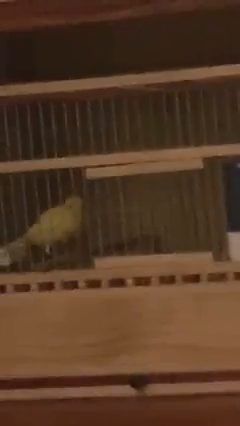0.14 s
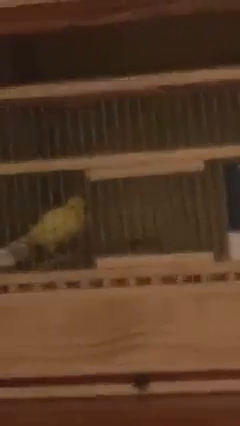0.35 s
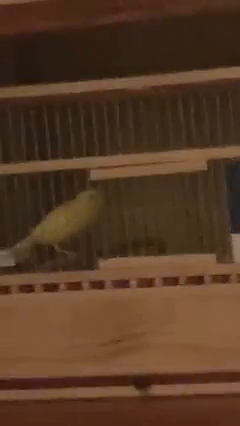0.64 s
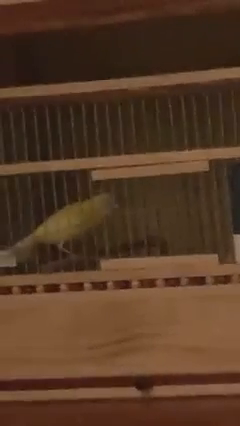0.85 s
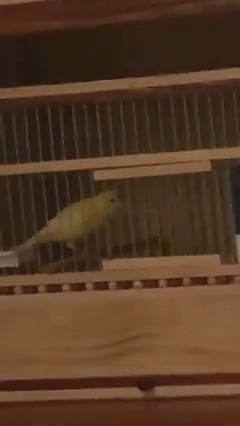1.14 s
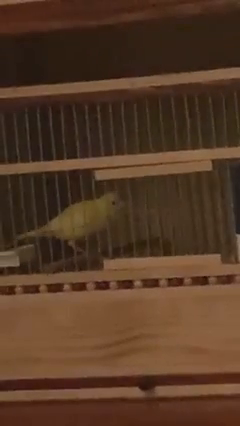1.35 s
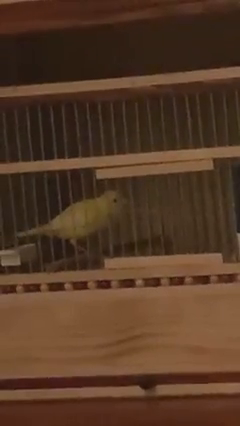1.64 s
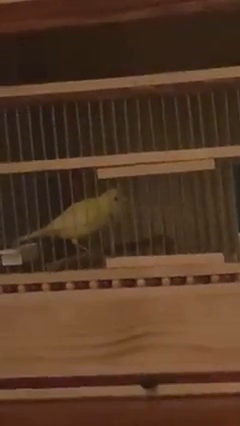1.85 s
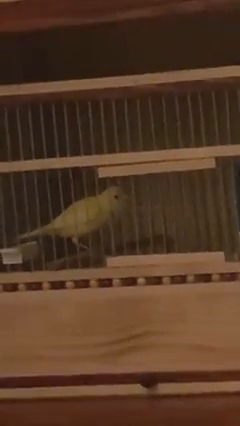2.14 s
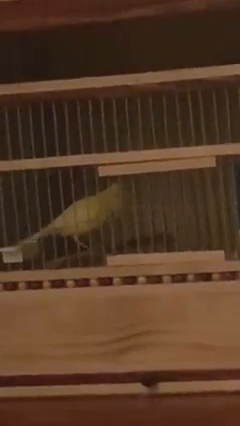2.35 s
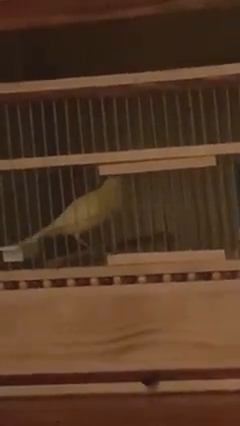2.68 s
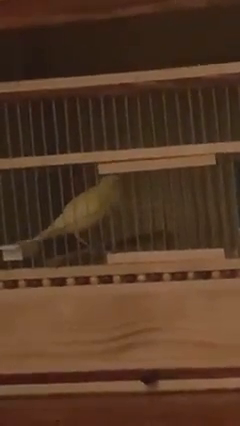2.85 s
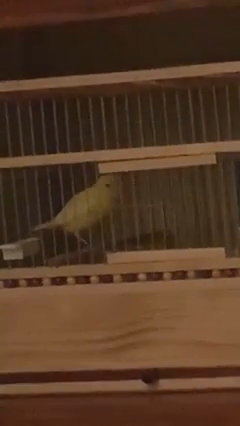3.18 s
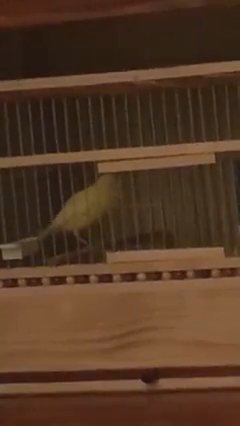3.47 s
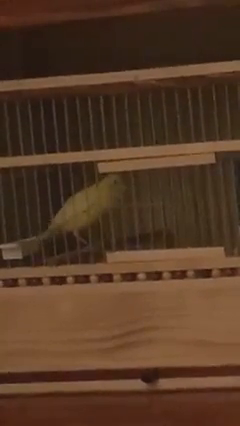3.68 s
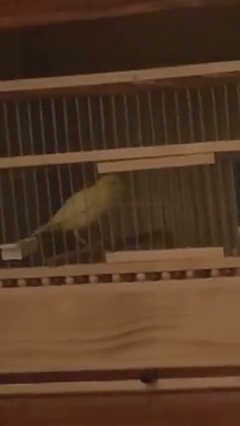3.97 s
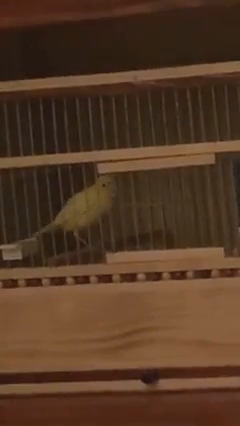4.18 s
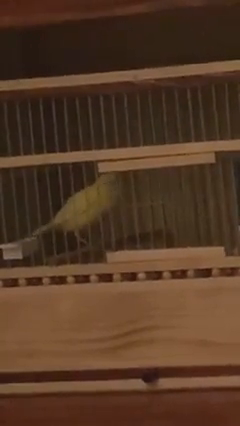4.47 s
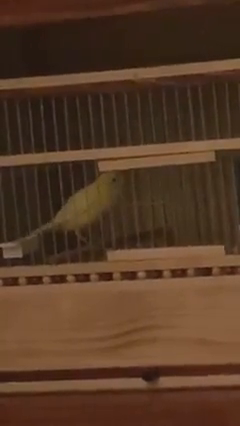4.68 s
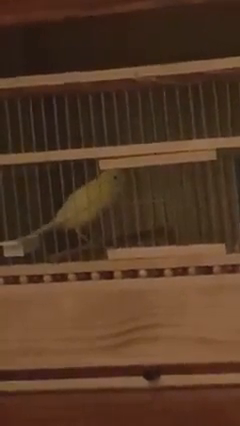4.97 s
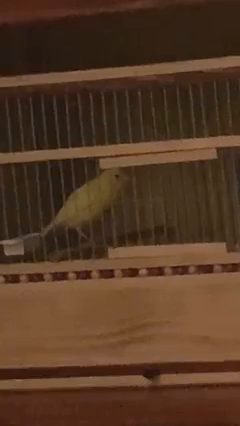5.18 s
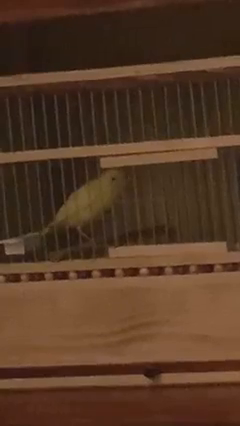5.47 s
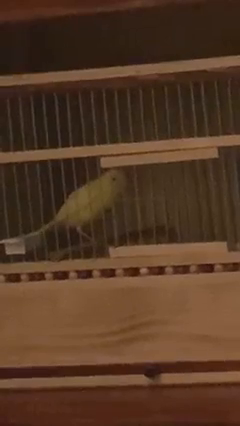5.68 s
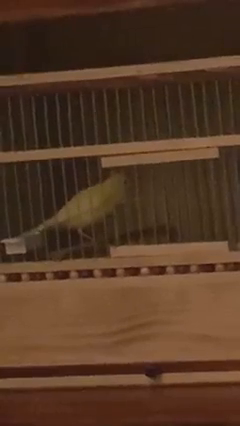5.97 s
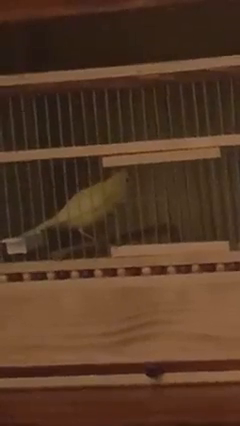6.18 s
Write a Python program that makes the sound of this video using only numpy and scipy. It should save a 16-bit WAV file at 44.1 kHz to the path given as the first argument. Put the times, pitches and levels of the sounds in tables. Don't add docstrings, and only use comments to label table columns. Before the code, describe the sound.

Small songbirds whistle, trill and chirp almost without pause indoors, over soft perch knocks, light wire rattles and a faint low rumble.

```python
import sys
import numpy as np
from scipy import signal
from scipy.fft import rfft, irfft, next_fast_len
from scipy.io import wavfile
from scipy.ndimage import uniform_filter1d, minimum_filter1d, map_coordinates

SR = 44100
rng = np.random.default_rng(int(sys.argv[2]) if len(sys.argv) > 2 else 0)


def gain_from_db(level_db):
    decades = np.asarray(level_db, float) / 20
    return 10 ** decades


def inscribe(sig):
    pcm = np.round(np.clip(np.atleast_2d(sig).T, -1, 1) * 32767)
    wavfile.write(sys.argv[1], SR, pcm.astype(np.int16))


N = 279153

# [f/Hz, density/dB per Hz]
RUMBLE_SPECTRUM = [(20, -21.5), (48, -10.5), (63, 9.5), (82, -0.5), (200, -5.5), (400, -74.5)]
MURMUR_SPECTRUM = [(100, -6), (200, -5.5), (400, -10.5), (800, -16), (1250, -10.5), (1600, -19.5),
                   (3000, -17.5), (5000, -38)]
HISS_SPECTRUM = [(3000, -49.5), (6000, 14), (8300, 10.5), (10500, 7.5), (12700, -12), (15800, -10)]
# [t/s, level/dB]
BUSTLE = [
    (0, -63.5),
    (.25, -81),
    (.6, -70),
    (1.6, -80),
    (2.0, -66.5),
    (2.7, -71.5),
    (3.5, -74.5),
    (4.2, -67.5),
    (5.1, -73.5),
    (6.33, -79.5),
]
RUMBLE_DB, SWELL_DB = -72, 9
SWELL_S, SWELL_WIDE_S = 2.58, 0.5

# [f/Hz, t60/s]
ROOM_T60 = [(300, 0.34), (2000, 0.33), (4000, 0.31), (8000, 0.3), (14000, 0.039)]
TAIL_S = np.arange(SR // 2) / SR
# [f/Hz, gain/dB]
MIC_RESPONSE = [(9000, 0.5), (11800, 0), (13000, -24.5), (15500, 1.5)]

# [t/s, peak level/dB, ring f/Hz]
FRAME_TAPS = [(0.129, -49, 217), (0.601, -54.5, 840), (0.834, -56, 846), (0.878, -55, 219),
              (0.942, -58.5, 804), (1.115, -49.5, 218.5), (1.208, -56, 858), (1.589, -58.5, 214),
              (1.94, -52.5, 826), (2.707, -48, 199), (3.169, -50, 631), (4.401, -51.5, 330),
              (5.943, -54.5, 848)]
# [t/s, peak level/dB, ring f/Hz]
KNOCKS = [
    (1.071, -53, 51.3),
    (1.34, -49.5, 1105),
    (3.01, -44, 1186),
    (4.575, -54, 48.4),
]

# [f/Hz, width/Hz, level/dB]
WOOD_MODES = [(256.5, 71, -6.5), (840, 646, -11.5), (1220, 106, 0), (1840, 1250, -20)]
WIRE_MODES = [(3480, 650, -5), (6500, 450, -10), (7760, 900, -17.5)]
CLAW_MODES = [(10530, 740, 11), (13700, 790, -3.5), (14900, 3900, -7)]
# [t/s, level/dB]
LANDINGS = [(.094, -54.5), (.926, -61), (1.129, -66.5), (1.21, -67), (1.338, -52.5), (1.85, -60.5),
            (1.899, -54.5), (2.379, -55.5), (2.745, -58.5), (3.011, -55), (3.117, -59), (3.167, -57),
            (3.531, -68), (3.64, -49.5), (3.819, -59.5), (3.888, -51), (3.966, -54), (4.15, -56.5),
            (4.235, -55), (4.345, -51), (4.547, -60.5), (4.767, -65.5), (4.936, -54), (5.364, -60.5),
            (5.889, -69), (5.946, -61)]
RATTLES = [(1.21, -55.5), (1.338, -49.5), (1.557, -50.5), (2.745, -69), (3.011, -60), (3.117, -70),
           (3.271, -50), (3.531, -45.5), (3.966, -59.5), (4.095, -39.5), (4.345, -44.5), (4.547, -50.5),
           (4.767, -70), (4.936, -63), (5.03, -53), (5.272, -40.5), (5.364, -49), (5.551, -55),
           (5.889, -65), (6.029, -42.5)]
SCRATCHES = [(1.557, -47), (1.899, -71.5), (2.379, -70.5), (2.745, -56.5), (3.011, -59.5), (3.117, -41.5),
             (3.271, -47.5), (3.531, -57.5), (3.966, -64.5), (4.105, -56), (4.345, -43), (4.77, -62.5),
             (5.03, -61), (5.272, -58), (5.364, -65), (5.551, -61.5), (5.889, -90), (6.029, -53)]

# [t/s, length/s, pitch f/Hz, glide/Hz, level/dB]
LOW_PIPES = [(0.0, 0.017, 2683, -52.5, -33.5), (0.37, 0.12, 2408, 278, -41),
             (1.158, 0.089, 2011, 188, -40.5), (1.758, 0.071, 2076, 317, -41.5),
             (1.953, 0.1, 2450, -130.0, -59.5), (2.411, 0.083, 2371, -17.5, -39.5),
             (2.636, 0.098, 2418, -62, -51), (3.571, 0.051, 2600, 102, -58.5),
             (3.861, 0.013, 2563, -54, -45), (4.131, 0.064, 2470, -32, -55.5),
             (4.488, 0.021, 2602, -4, -44.5), (4.721, 0.035, 2614, -13, -49.5),
             (4.875, 0.054, 2105, 3, -36.5), (4.983, 0.049, 2125, -15, -44), (5.062, 0.099, 2060, -9, -51),
             (5.342, 0.1, 2063, 118.5, -43.5), (5.467, 0.2, 2200.0, -9.5, -49),
             (5.61, 0.034, 2121, -58.5, -31), (5.737, 0.17, 2169, 21.5, -45),
             (6.027, 0.11, 2097, 5.5, -42.5), (6.2, 0.039, 2071, -29, -44),
             (6.229, 0.13, 2610.0, 83.5, -37)]
MID_WHISTLES = [(0.626, 0.3, 3357, 57, -35), (0.92, 0.089, 2962, 78, -34.5),
                (1.46, 0.14, 3130.0, -9, -34.5), (2.14, 0.015, 3203, 148, -44.5),
                (3.404, 0.11, 3258, -160.0, -40.5), (3.666, 0.05, 3260, -87, -40.5),
                (3.771, 0.063, 3173, -100, -49.5), (3.958, 0.16, 3184, -220.0, -48),
                (4.234, 0.065, 3195, 21.5, -37.5), (4.321, 0.087, 3223, -91, -46),
                (4.4, 0.1, 3288, -48.5, -34.5), (4.578, 0.16, 3238, -26, -36.5),
                (4.907, 0.1265, 3297, -170, -37), (5.21, 0.1, 3281, -30.0, -39.5),
                (5.98, 0.17, 3086, 80.0, -38)]
HIGH_WHISTLES = [(0.0, 0.013, 4200.0, -10.0, -39.5), (0.608, 0.115, 4265, 147.5, -37.5),
                 (1.214, 0.11, 4370, -250, -38.5), (1.508, 0.09, 3674, 343, -35),
                 (1.99, 0.072, 4073, 96, -42.5), (2.09, 0.21, 4710, 47.5, -44.5),
                 (2.827, 0.109, 4810, -33, -40.5), (2.944, 0.096, 4656, -40.5, -40),
                 (5.308, 0.09, 3990, 89.5, -49.5), (6.014, 0.049, 5850, 67, -52.5)]
TRILLS = [(1.451, 0.055, 5430, -530.0, -51.5), (1.921, 0.038, 5640, -350.0, -35.5),
          (2.378, 0.089, 5580, 109, -34), (2.581, 0.046, 5785, -84, -36.5),
          (2.945, 0.025, 6200, -100, -40.5), (2.957, 0.055, 5620, 45, -32),
          (3.156, 0.051, 5693, -56, -35.0), (3.343, 0.075, 5376, 249.5, -45.5)]
BUZZ_NOTES = [(0.144, 0.19, 3112, -50.0, -39.5), (1.72, 0.16, 3338, 428.5, -39),
              (2.203, 0.13, 3930, 100, -54), (2.729, 0.11, 3971, 108.5, -38),
              (3.264, 0.11, 4200, -250, -39.5), (3.507, 0.12, 4084, -120, -37.5),
              (4.177, 0.11, 3810, 455.5, -32), (5.558, 0.055, 4090, -100, -48),
              (6.21, 0.042, 3465, -150, -39.5)]
RASPS = [
    (3.098, 0.042, 5870, -200, -47.5),
    (3.102, 0.034, 3945, 153, -48.5),
    (4.758, 0.019, 4520, 33, -54.5),
    (5.264, 0.03, 4640.0, -12, -61),
]
BRIGHT_WHISTLES = [(1.551, 0.047, 5465, 39, -52), (3.73, 0.146, 5660, -140.0, -42),
                   (3.964, 0.114, 5473, -110.0, -40.5), (4.307, 0.04, 5360, -34.5, -48),
                   (4.508, 0.045, 5380, -750, -48), (4.771, 0.021, 5304, -14, -48.5)]
CHIPS = [(0.339, 0.029, 3733, -500, -40), (1.123, 0.028, 4255, -450, -43), (2.743, 0.023, 5220, 308, -46),
         (2.776, 0.023, 5550, 642, -42), (3.27, 0.038, 6646, -350, -38.5),
         (3.503, 0.014, 5964, -100, -41.5), (4.838, 0.028, 4136, -250, -41.5),
         (5.439, 0.021, 5690, -150, -42), (5.528, 0.0337, 4830, -650, -38.5),
         (5.754, 0.042, 3857, 343, -41.5), (5.873, 0.038, 4480, 495, -44), (5.884, 0.045, 5915, 340, -47),
         (6.016, 0.025, 4356, -450, -28)]
POPS = [
    (2.187, 0.0063, 3436, 45, -24.5),
    (6.193, 0.0087, 3520, -11, -22),
]
# [overtone level/dB, fade over note/dB, attack/s, release/s]
VOICES = [
    (-30.5, -6, .035, 0.032),
    (-28.5, -6, .035, 0.03),
    (-26, 1, 0.033, .035),
    (-45.5, 1, .025, 0.024),
    (-26.5, 9, .035, .035),
    (-2.5, 12.5, 0.0096, 0.044),
    (-14, 0, .025, 0.04),
    (-23.5, 3, 0.017, 0.016),
    (-33.5, -2, 0.0056, 0.014),
]
# [buzz depth at start/Hz, at end/Hz, quaver/Hz]
UNSTEADINESS = [(4, 12, 33), (6, 20, 36), (15, 45, 42), (40, 75, 45), (55, 170, 45), (250, 300, 42),
                (30, 50, 42), (25, 90, 42), (5, 40, 15)]
ATTACK_LEAD = 0.35
GLIDE_BEND = 0.65
VOICE_DB = 0.5


def unit(x):
    return x / np.sqrt(np.mean(x ** 2) + 1e-20)


def along(points, hz):
    f, value = np.transpose(points)
    return np.interp(np.log(hz + 1), np.log(f + 1), value)


def wobble(knots_hz, size):
    return map_coordinates(rng.standard_normal(size=400), [np.arange(size) * knots_hz / SR])


def filtered(x, response):
    m = next_fast_len(N + SR // 2)
    return irfft(rfft(x, m) * response(np.fft.rfftfreq(m, 1 / SR)), m)[:N]


def body(modes):
    def response(f):
        total = 0
        for k, (centre_hz, width_hz, db) in enumerate(modes):
            damping = 1j * f * width_hz
            total = total + (-1) ** k * gain_from_db(db / 2) * damping / (centre_hz ** 2 - f * f + damping)
        return total ** 2
    return response


def in_room(x, hz, direct_db):
    decay = gain_from_db(-60 * TAIL_S / along(ROOM_T60, hz))
    tail = rng.standard_normal(len(TAIL_S)) * decay * (1 - np.exp(-TAIL_S / 0.0013))
    tail = tail / np.linalg.norm(tail)
    tail[0] = gain_from_db(direct_db)
    return signal.fftconvolve(x, tail)


def add(track, start_s, x):
    part = track[round(max(start_s, 0) * SR):][:len(x)]
    part += x[:len(part)]


def rush(spectrum, patchy_db):
    z = signal.stft(rng.standard_normal(N), nperseg=512)[2]
    field = uniform_filter1d(rng.standard_normal(z.shape), 5, 0)
    field = uniform_filter1d(field, 12, 1)
    x = signal.istft(z * gain_from_db(patchy_db * unit(field)), nperseg=512)[1][:N]
    return unit(filtered(x, lambda hz: gain_from_db(along(spectrum, hz))))


def air():
    t = np.arange(N) / SR
    rumble_db = RUMBLE_DB + SWELL_DB * np.exp(-((t - SWELL_S) / SWELL_WIDE_S) ** 2)
    rumble = gain_from_db(rumble_db + 0.7 * wobble(2.3, N)) * rush(RUMBLE_SPECTRUM, patchy_db=1.0)
    murmur_db = np.interp(t, *np.transpose(BUSTLE)) + 4.5
    murmur = gain_from_db(murmur_db) * rush(MURMUR_SPECTRUM, patchy_db=6.0)
    hiss = gain_from_db(-77) * rush(HISS_SPECTRUM, patchy_db=14.0)
    return rumble + murmur + hiss


def taps():
    out = np.zeros(N)
    for start_s, db, hz in FRAME_TAPS + KNOCKS:
        decay = gain_from_db(-60 * TAIL_S / (0.1 + 9 / hz))
        ring = np.sin(2 * np.pi * hz * TAIL_S) * decay * (1 - np.exp(-TAIL_S / 0.0021))
        add(out, start_s, gain_from_db(db + 1.0) * ring)
    return out


def contact_clump(response, hz):
    t = np.arange(SR // 10) / SR
    noise = rng.standard_normal(len(t))
    clump = gain_from_db(6.9 * wobble(197.3, len(t)) - 60 * t / 0.16) * np.minimum(t / 0.014, 1) ** 2
    spot = gain_from_db(4 * wobble(5e6 / hz + 500, len(t) // 2 + 1))
    spectrum = rfft(clump * irfft(rfft(noise) * spot))
    return irfft(spectrum / np.linalg.norm(spectrum * response))


def hops():
    bin_hz = np.fft.rfftfreq(SR // 10, 1 / SR)
    out = np.zeros(N)
    for contacts, modes, hz, gain_db in [(LANDINGS, WOOD_MODES, 360, 59.1),
                                         (RATTLES, WIRE_MODES, 11000, 59.46),
                                         (SCRATCHES, CLAW_MODES, 12000, 57.3)]:
        shocks = np.zeros(N)
        response = body(modes)(bin_hz)
        for start_s, db in contacts:
            shock = in_room(contact_clump(response, hz), hz, direct_db=-1)
            add(shocks, start_s - 0.012, gain_from_db(db + gain_db) * shock)
        out += filtered(shocks, body(modes))
    return out


def sing(out, note, voice, unsteadiness):
    start_s, length_s, hz, glide_hz, db = note
    over_db, fade_db, attack_s, release_s = voice
    calm_hz, wide_hz, quaver_hz = unsteadiness
    t = np.arange(0, length_s + ATTACK_LEAD * attack_s + release_s / 2, 1 / SR)
    done = t / t[-1]

    buzz_hz = calm_hz + (wide_hz - calm_hz) * done
    shake_hz = 165 + 15 * wobble(40, len(t))
    shake = np.sin(2 * np.pi * np.cumsum(shake_hz) / SR + 2 * np.pi * rng.random())
    pitch_hz = hz + glide_hz * done ** GLIDE_BEND + 1.2 * buzz_hz * shake
    pitch_hz = pitch_hz + quaver_hz * wobble(70.2, len(t))
    phase = 2 * np.pi * np.cumsum(pitch_hz) / SR

    rise = (t + (start_s == 0)) / attack_s
    fall = (t[-1] - t) / release_s
    edge = np.sin(np.pi / 2 * np.clip(np.minimum(rise, fall), 0, 1))
    breath_db = db + VOICE_DB - fade_db * (done - 0.5) + quaver_hz / 11 * wobble(77.4, len(t))
    breath = edge * gain_from_db(breath_db)
    breath = breath * (1 + np.tanh(buzz_hz / 250) * shake)

    upper = np.sin(2 * phase) + gain_from_db(-11.5) * np.sin(3 * phase)
    upper = upper + gain_from_db(-15.0) * np.sin(4 * phase) * (hz < SR / 10)
    lead_s = ATTACK_LEAD * attack_s
    add(out, start_s - lead_s, in_room(breath * np.sin(phase), hz, direct_db=-1))
    add(out, start_s - lead_s, in_room(gain_from_db(over_db) * breath * upper, 2 * hz, direct_db=-1))


def birds():
    out = np.zeros(N)
    kinds = [LOW_PIPES, MID_WHISTLES, HIGH_WHISTLES, TRILLS, BUZZ_NOTES, RASPS, BRIGHT_WHISTLES, CHIPS, POPS]
    for kind, voice, unsteadiness in zip(kinds, VOICES, UNSTEADINESS):
        for note in kind:
            sing(out, note, voice, unsteadiness)
    return out


def scene():
    return (air() + taps() + hops() + birds())[None]


def hushed_beside_tones(x, reach_db, depth_db):
    hz, _, z = signal.stft(x, SR, nperseg=1024)
    power = uniform_filter1d(np.abs(z) ** 2, size=7, axis=0)
    power = uniform_filter1d(power, size=3, axis=1)
    level_db = 10 * np.log10(np.abs(power) + 1e-20)
    loudest_db = -minimum_filter1d(-level_db, size=61, axis=0)
    muted = (hz[:, None] > 2400) / (1 + gain_from_db(8.3 * (level_db - loudest_db + reach_db)))
    return signal.istft(z * gain_from_db(-depth_db * muted), SR, nperseg=1024)[1][..., :N]


def roll_off(x):
    return signal.sosfilt(signal.butter(12, 15830, fs=SR, output="sos"), x)


def record(dry):
    heard = filtered(dry[0], lambda hz: gain_from_db(along(MIC_RESPONSE, hz)))
    mix = hushed_beside_tones(heard, reach_db=45.5, depth_db=13.5)[None]
    return roll_off(mix)


dry = scene()
out = record(dry)
inscribe(out)
```